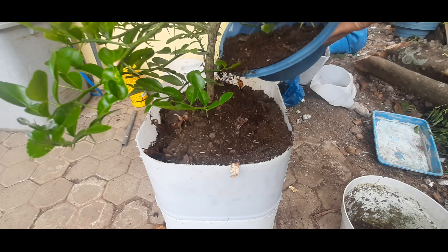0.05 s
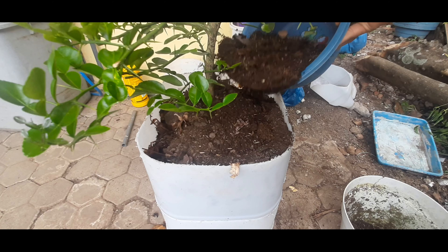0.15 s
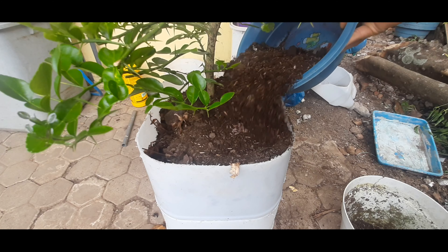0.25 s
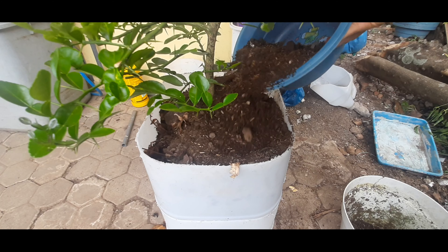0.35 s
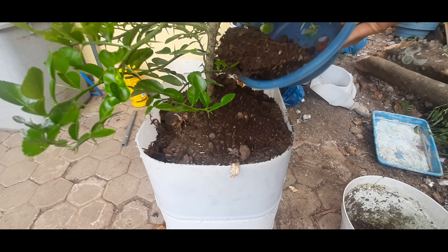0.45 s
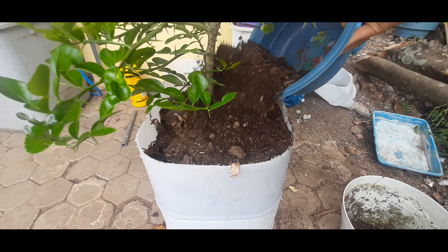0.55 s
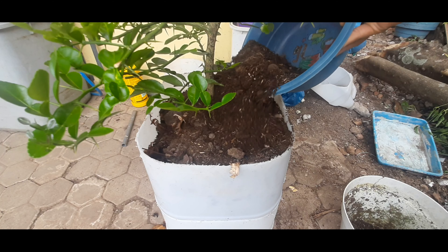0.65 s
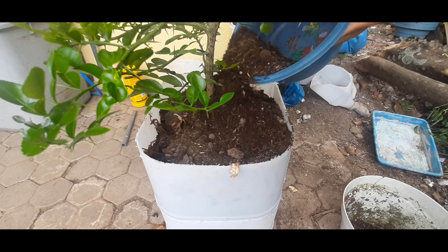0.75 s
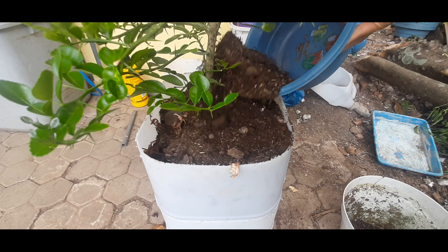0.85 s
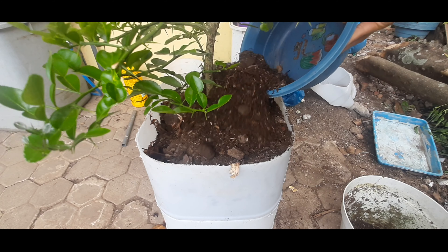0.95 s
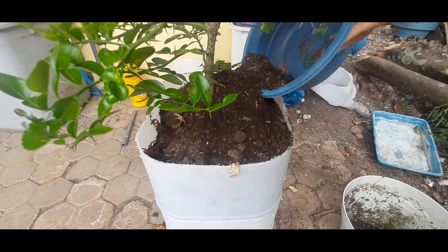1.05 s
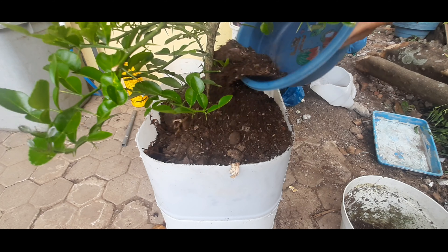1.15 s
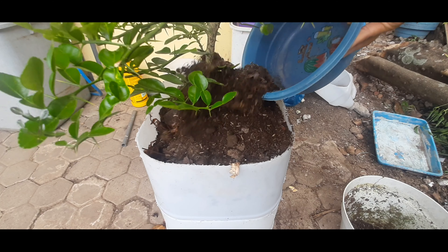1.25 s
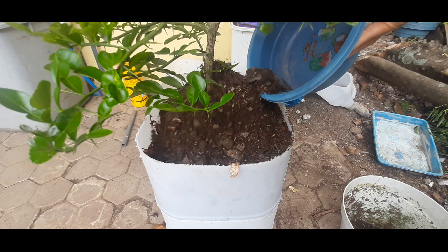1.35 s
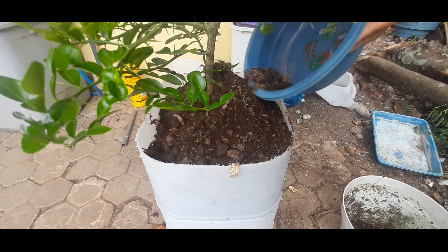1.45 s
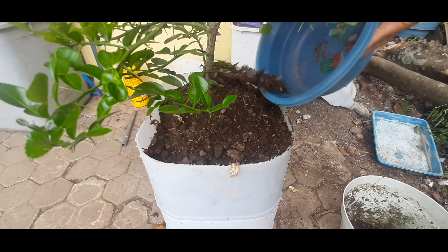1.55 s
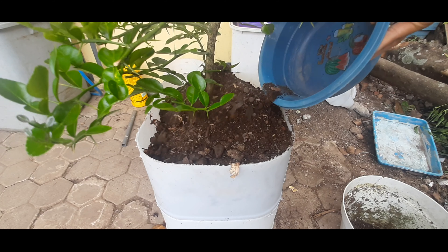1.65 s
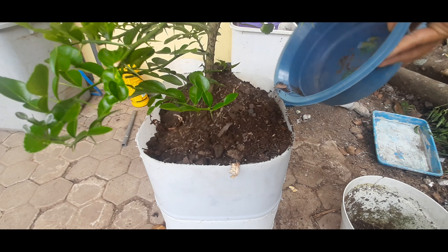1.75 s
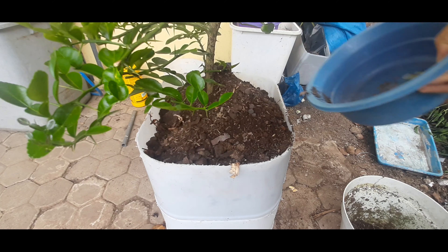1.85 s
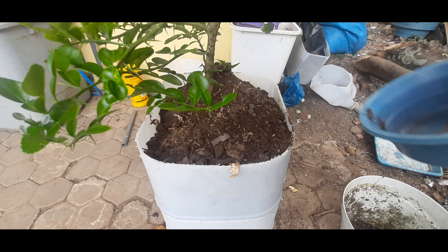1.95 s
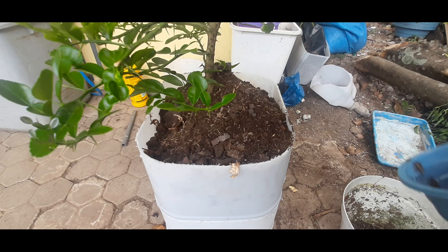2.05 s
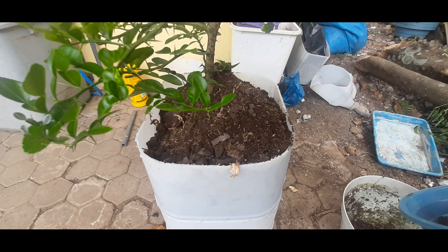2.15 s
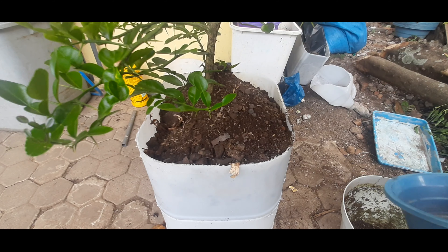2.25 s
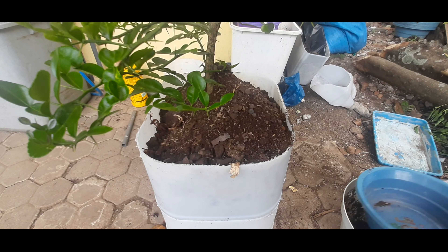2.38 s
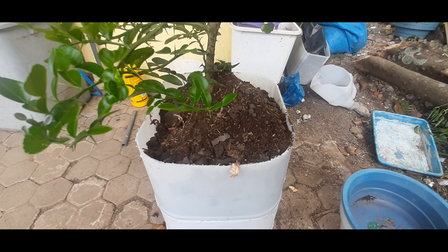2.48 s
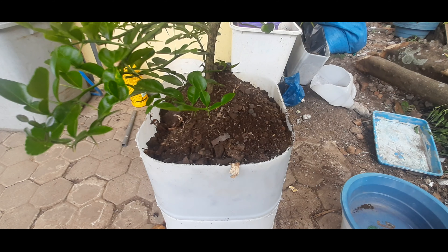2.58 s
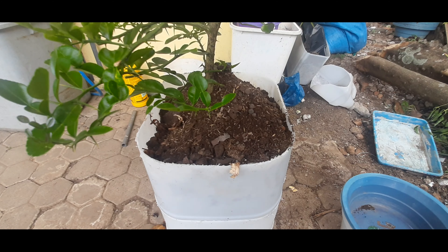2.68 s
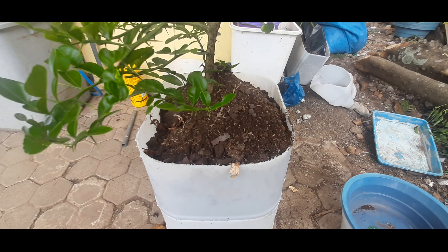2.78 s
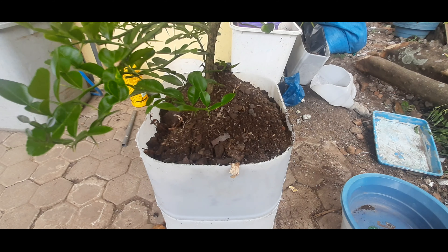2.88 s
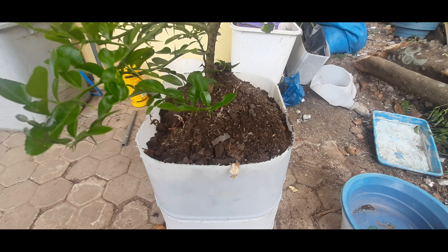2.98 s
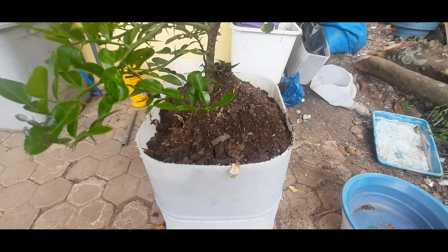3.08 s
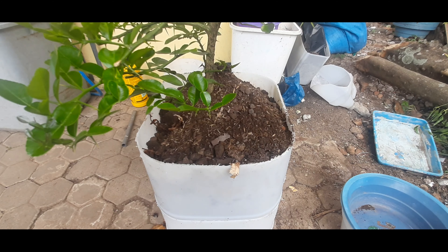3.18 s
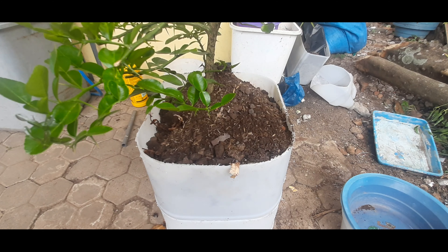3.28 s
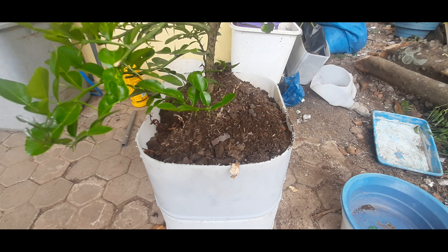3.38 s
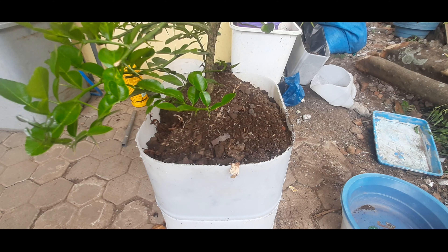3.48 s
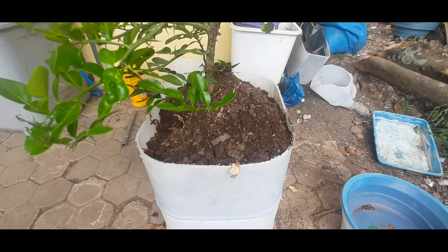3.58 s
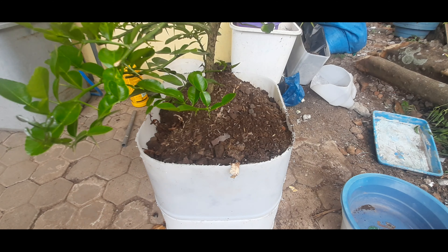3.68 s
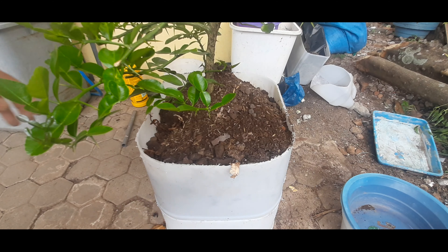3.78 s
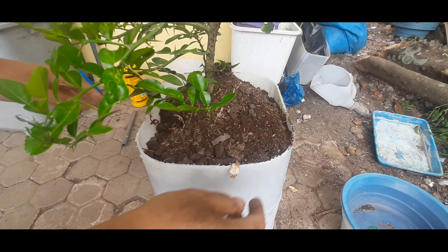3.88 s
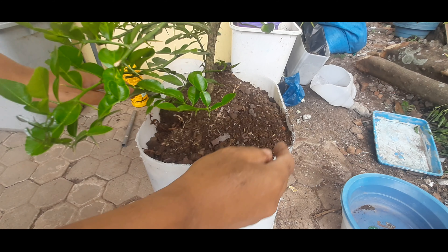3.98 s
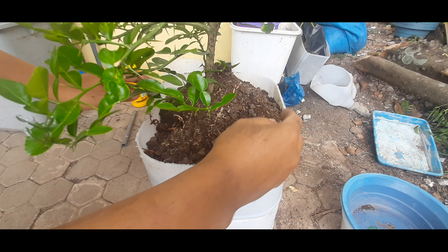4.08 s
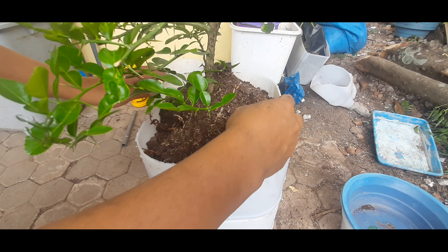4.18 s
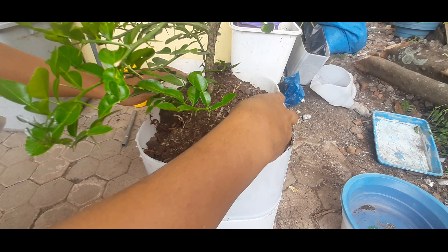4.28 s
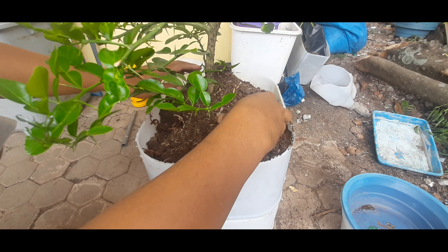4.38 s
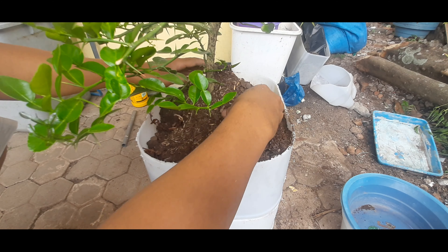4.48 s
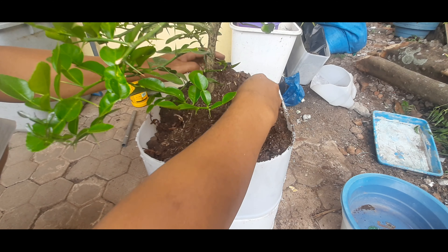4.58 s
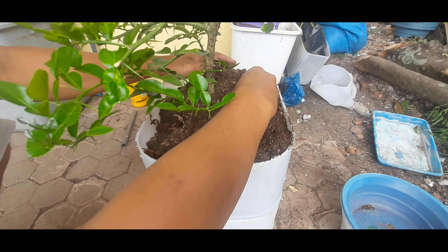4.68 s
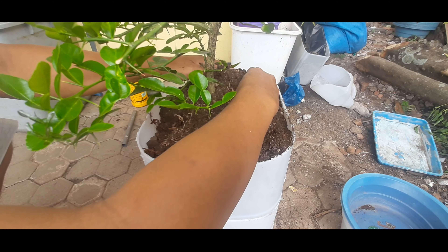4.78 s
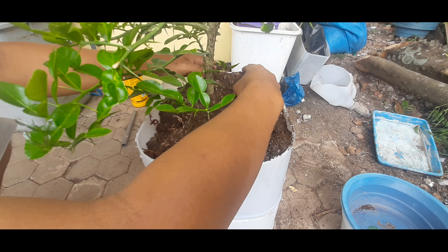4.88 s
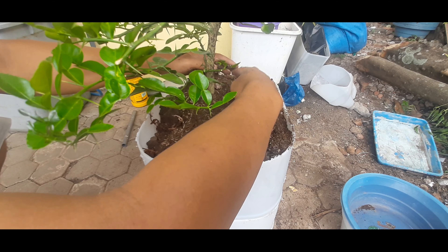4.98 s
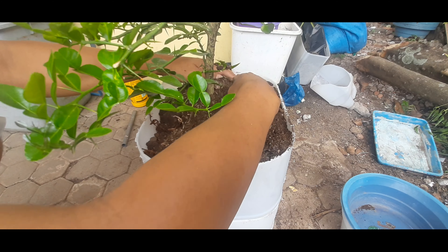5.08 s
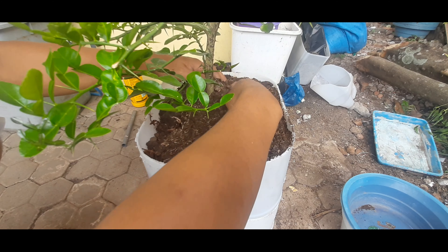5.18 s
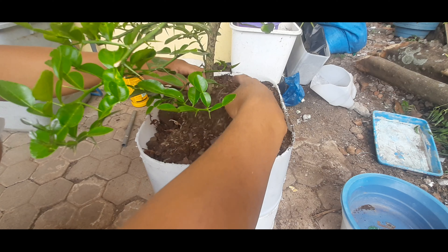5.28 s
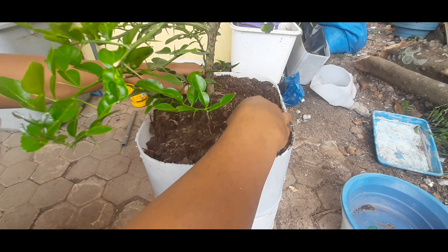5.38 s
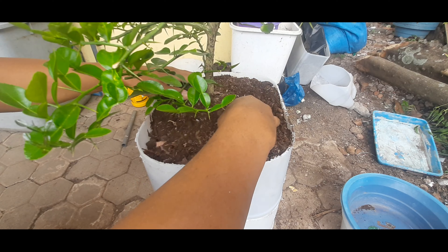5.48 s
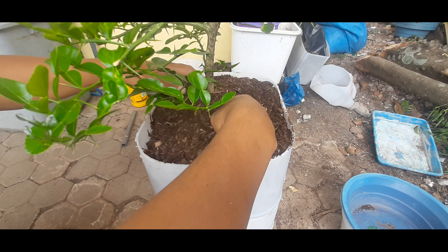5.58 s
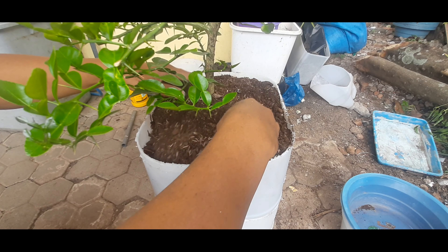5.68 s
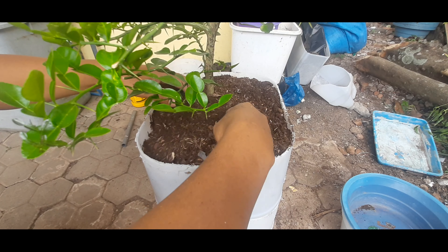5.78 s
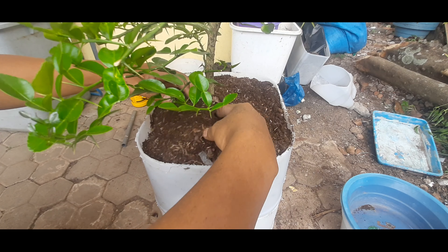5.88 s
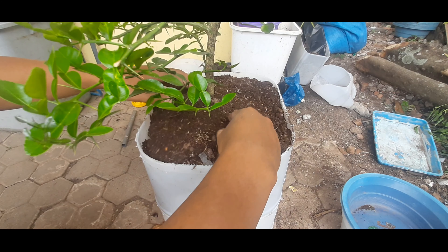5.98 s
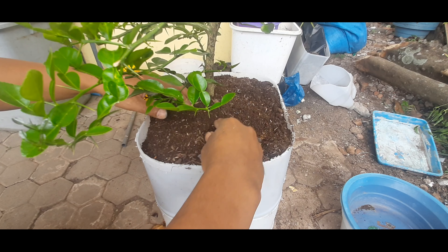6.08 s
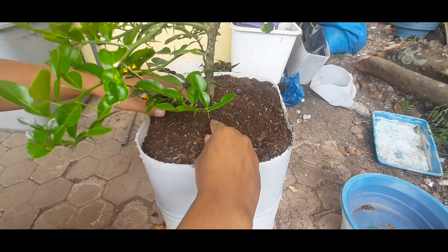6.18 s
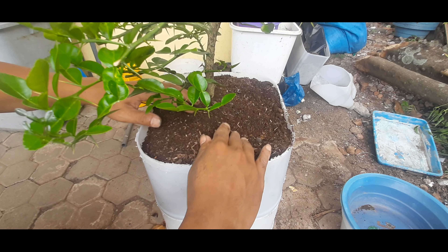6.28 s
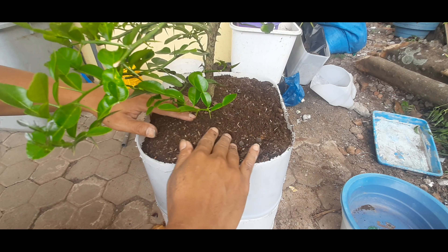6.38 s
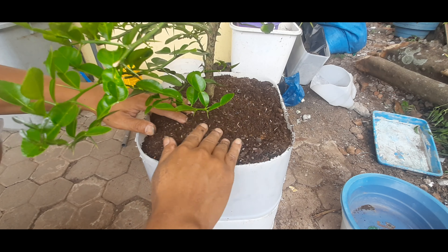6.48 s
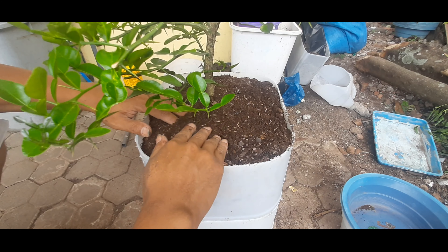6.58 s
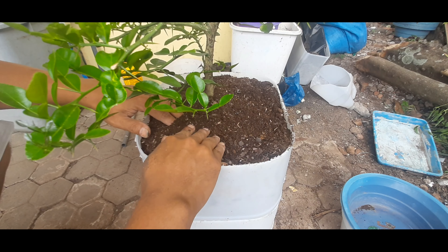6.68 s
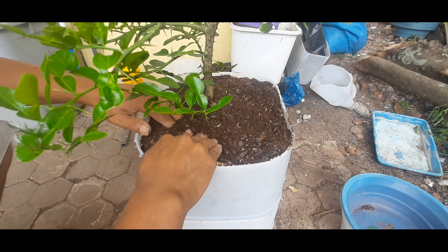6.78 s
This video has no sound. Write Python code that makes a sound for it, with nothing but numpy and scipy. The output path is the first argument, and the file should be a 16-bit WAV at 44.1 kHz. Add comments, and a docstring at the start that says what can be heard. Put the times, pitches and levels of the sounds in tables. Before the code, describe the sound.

A close, dry stereo outdoor scene with faint wavering engine drone, low traffic rumble and thin air hiss throughout. From 0 to 1.7 seconds, soil is shaken from a plastic basin into a planter in uneven crunchy, hissing slides, strongest near 0.2 and 0.6, with clods knocking and dry ticks. Sparse trickles and grit continue until about 2.45. At 2.5 the empty basin hits paving, by far the loudest event: a hollow plastic clack, then a fast, gritty rattle fading by 2.75. Feet scuff at 3.1, step softly near 3.67 and 4.0, with a tiny falling squeak at 3.76. Leaves swish around 3.2, 4.2, 5.5 and 6.5-6.7. A low soft thud comes at 4.8; hands brush faintly, pressing soil at 5.75 and 6.0 with small ticks. A faint motor hum rises near 6. The work shifts from right to left around 3.5.

```python
"""Far engine notes and rumble drone throughout under a thin air hiss. First, soil is shaken from a plastic
basin into a planter: random grains make crunch and hiss, and clods knock with short fading tones.
Then the basin drops on paving and rocks to rest: blows and grating set fading tones ringing in its wall.
Last, feet shuffle, a sole squeaks, and hands brush and press the soil past leaves that swish with clicks.
Two microphone ports a few centimetres apart hear the work move from right to left."""
import sys
import numpy as np
from scipy import signal
from scipy.fft import rfft, irfft
from scipy.io import wavfile
from scipy.ndimage import uniform_filter1d

SR = 44100
rng = np.random.default_rng(int(sys.argv[2]) if len(sys.argv) > 2 else 0)


def log_audio(samples):
    """Write samples as a 16-bit WAV file to the path given in sys.argv[1]."""
    # one column per channel
    frames = np.atleast_2d(samples).T
    # limit to full scale, then quantise
    limited = np.clip(frames, -1, 1)
    pcm = np.round(limited * 32767).astype(np.int16)
    wavfile.write(sys.argv[1], SR, pcm)


N = 302085


def undb(db):
    """Turn decibels into a plain multiplier."""
    return 10 ** (np.asarray(db) / 20)


def unit(x):
    """Scale a sound to an average (RMS) strength of 1."""
    return x / np.sqrt(np.mean(x ** 2))


def curve(rows):
    """Join each column of a table by straight lines over time, one value a sample."""
    s, *columns = np.transpose(rows)
    return [np.interp(np.arange(N) / SR, s, column) for column in columns]


def colour(x, points):
    """Make pitches stronger or weaker by (f/Hz, level/dB) points."""
    hz, db = np.transpose(points)
    log_hz = np.log(np.fft.rfftfreq(N, 1 / SR) + 1)  # + 1 avoids the log of zero
    gain = undb(np.interp(log_hz, np.log(hz), db))
    return irfft(rfft(x) * gain, N)


def ring(x, hz, t60):
    """Let x strike one tone that fades by 60 dB in t60 seconds."""
    pole = np.exp(2j * np.pi * hz / SR - np.log(1000) / (t60 * SR))
    return signal.lfilter([1], [1, -pole], x).imag


def walk(rate):
    """Wander smoothly: random steps, rate of them a second, averaged twice; spread near 1."""
    k = int(SR / rate)
    steps = np.repeat(rng.standard_normal(N // k + 1), k)
    return 1.694 * uniform_filter1d(uniform_filter1d(steps, k), k)[:N]


def grains(rate, spread_db, tail_s):
    """Scatter clicks of very uneven size, rate a second, each smeared into a short puff of noise."""
    clicks = (rng.random(N) < rate / SR) * undb(spread_db * rng.exponential(size=N))
    puffs = signal.lfilter([1], [1, -np.exp(-1 / (tail_s * SR))], clicks)
    return puffs * rng.standard_normal(N)


def add(track, s, shape):
    """Mix a short sound into a track at s seconds."""
    i = int(s * SR)
    track[i:i + len(shape)] += shape[:N - i]


def burst(decay_s, dull=.4):
    """Make a fading crack of noise; the duller, the lower the pitches where its noise gathers."""
    t = np.arange(int(8 * decay_s * SR)) / SR
    pole = np.clip(dull, 0, 1 - 1 / 8)
    noise = signal.lfilter([1, -1], [1, -2 * pole, pole ** 2], rng.standard_normal(len(t)))
    return unit(noise) * np.exp(-t / decay_s) / 2


def ports(x, wet_db):
    """The far port hears it a little later; scattering off leaves and walls adds its own part to each."""
    # the work moves from right to left: t/s, delay of the left port/s (below zero delays the right)
    port_lag = [(3.3, .00011), (3.6, -.00025)]
    yard_t60_s = .07  # time for the scattered sound to fade by 60 dB
    now = np.arange(N)
    lag = np.round(curve(port_lag)[0] * SR).astype(int)
    delays = np.maximum([lag, -lag], 0)
    direct = x[np.maximum(now - delays, 0)]
    t = np.arange(int(yard_t60_s * SR)) / SR
    tails = rng.standard_normal((2, len(t))) * 1000 ** (-t / yard_t60_s)
    tails = signal.lfilter([1, -.6], [1], tails)  # small surfaces return less bass
    wet = [signal.fftconvolve(x, unit(tail) / np.sqrt(len(t)))[:N] for tail in tails]
    return direct + undb(wet_db) * np.array(wet)


def note(hz, db, octave_db):
    """An engine note and its octave, wavering in pitch and level."""
    phase = 2 * np.pi * np.cumsum(hz * (1 + 0.009 * walk(14))) / SR
    level = np.sqrt(2) * undb(db + 2 * walk(12))
    octave = undb(octave_db + 2 * walk(8.8)) * np.sin(2 * phase)
    return level * (np.sin(phase) + octave)


def street():
    """Engine notes and rumble, nearly alike at both ports, and a thin air hiss that is not."""
    # two far engine notes: t/s, lower f/Hz, lower level/dB, upper f/Hz, upper level/dB
    drone = [(0, 106.4, -49.5, 115.9, -54), (.65, 106.5, -45, 128.4, -48),
             (1.9, 103.9, -55.5, 123.4, -42.5), (2.03, 106, -55, 127.1, -62),
             (2.36, 111.2, -45, 130.5, -48.5), (3.55, 97.8, -57.5, 132.6, -59.5),
             (3.9, 113.1, -50, 125, -55.5), (5.04, 104.2, -73, 132, -55), (5.5, 110.9, -52, 130, -50),
             (6.55, 119.5, -48.5, 127.8, -73)]
    # a faint motor tone, slightly wavering: f/Hz, level/dB
    motor_notes = [(301.5, -59)]
    # the motor comes up late: t/s, level/dB
    motor_rise = [(5.7, -14), (6.2, 0)]
    # strength of the traffic rumble: t/s, level/dB
    traffic = [(1.8, -49), (3.3, -54.5), (4.5, -49.5), (5.7, -51.5), (6.85, -47)]
    # balance of pitches in the rumble: f/Hz, relative level/dB
    traffic_colour = [(25, -56.5), (40, -7.5), (113, -3), (157, -10.5), (217, -5.5), (278, -12.5),
                      (630, -20.5), (792, -32.5), (1500, -46.5)]
    # balance of pitches in the air hiss: f/Hz, relative level/dB
    air_colour = [(600, -32.5), (900, -5.5), (2140, 1.5), (4500, -22), (8250, -5.5), (16000, -16.5)]
    low_hz, low_db, high_hz, high_db = curve(drone)
    notes = note(low_hz, low_db, octave_db=-12.0) + note(high_hz, high_db, octave_db=-14.5)
    motor = sum(note(np.full(N, 1. * hz), db, octave_db=-8.5) for hz, db in motor_notes)
    motor = motor * undb(curve(motor_rise)[0])
    mid, side = (unit(colour(rng.standard_normal(N), traffic_colour)) for _ in range(2))
    side = colour(side, [(40, -10.0), (120, -14.5), (1400, 1.5)])
    # the side part is added at one port and subtracted at the other
    rumble = undb(curve(traffic)[0] + walk(2.854)) * (mid + side * np.array([[1], [-1]]))
    air = [unit(colour(rng.standard_normal(N), air_colour)) * undb(-73) for _ in range(2)]
    return (notes + motor + rumble) * undb([[.7], [-.7]]) + np.array(air)


def swells(rows, rise, fall):
    """Power of crunch and hiss: every row rises at a steady dB rate, holds and falls."""
    s, hold, *db = np.transpose(rows)[:, :, None]
    t = np.arange(N) / SR
    early = np.maximum(s - t, 0)
    late = np.maximum(t - s - np.maximum(hold, 0), 0)
    return np.array([np.sum(undb(2 * (d - r * early - f * late)), axis=0)
                     for d, r, f in zip(db, rise, fall)])


def motion():
    """Levels of crunch and hiss in dB, adding the power of all that moves soil or grit."""
    # soil trickling over the rim between shakes, then a faint steady sift:
    # t/s, crunch level/dB, hiss level/dB
    trickle = [(0, -62, -56.5), (.09, -73, -63), (.4, -65, -56.5), (1.03, -59.5, -57.5), (1.35, -65, -52),
               (1.6, -55, -53), (2.2, -69, -57.5), (2.75, -66.5, -66.5), (2.95, -100, -71.5)]
    # each shake of the basin lets a slide of soil go:
    # t/s, hold/s, level/dB for crunch of crumbs, level/dB for hiss of fine dust
    pours = [(0.15, 0.15, -49, -53), (0.2, 0.015, -38, -45.5), (0.51, 0.14, -47, -57),
             (0.575, 0.0044, -45.5, -43), (0.845, 0.12, -51, -53), (1.13, 0.18, -53, -62),
             (1.535, 0.016, -44.5, -51), (2.03, 0.0044, -54, -55), (2.28, 0.067, -56, -54),
             (2.46, 0.24, -51.5, -57)]
    # a foot or hand slides along: t/s, hold/s, crunch level/dB, hiss level/dB
    brushes = [(3.13, 0.11, -55.5, -54.5), (3.81, 0.048, -65, -69), (4.19, 0.0084, -61.5, -56),
               (4.33, 0.063, -63, -71), (4.5, 0.43, -70, -67), (5.39, 0.28, -76, -60),
               (6.255, 0.029, -62, -70), (6.44, 0.093, -64.5, -61), (6.72, 0.12, -63, -83)]
    # a foot or palm lands at once, presses on and the grains settle:
    # t/s, hold/s, crunch level/dB, hiss level/dB
    pats = [(3.67, 0.0099, -50, -53), (4.008, 0.0061, -53.5, -50.5), (5.745, 0.097, -58, -58.5),
            (6.012, 0.05, -55.5, -59.5)]
    # rise and fall are in dB per s, as (crunch, hiss)
    power = undb(2 * np.array(curve(trickle)))
    power = power + swells(pours, rise=(420, 220), fall=(360, 160))
    power = power + swells(brushes, rise=(320, 210), fall=(280, 240))
    power = power + swells(pats, rise=(2600, 1900), fall=(144, 99))
    return 10 * np.log10(power)


def soil():
    """Crumbs of each size come and go and ring briefly; dust is a denser hiss, different at each port."""
    # balance of pitches in the crumbs: f/Hz, relative level/dB
    crumb_colour = [(250, -22.5), (400, -4.5), (850, -3), (1100, -8), (1900, -0.5), (3200, -12.5),
                    (6000, -31)]
    # balance of pitches in the dust: f/Hz, relative level/dB
    dust_colour = [(3500, -16), (12500, -11), (16000, -16.5)]
    sand_colour = [(1800, -23.5), (3000, -5.5), (8000, -23.5)]  # f/Hz, relative level/dB
    steps_start_s, steps_end_s = 2.8, 4.3
    crunch_db, hiss_db = motion()
    now = np.arange(N) / SR
    # after the pour both low and high crumb tones weaken; under the feet the low ones weaken more
    after_pour = now > steps_start_s
    under_feet = after_pour & (now < steps_end_s)
    sizes = []
    for hz in 350 * 1.25 ** np.arange(13):
        low_cut_db = (8.0 * after_pour + 8.0 * under_feet) * max(np.log2(1500 / hz), 0)
        high_cut_db = 25.0 * after_pour * max(np.log2(hz / 2900), 0)
        clicks = grains(rate=260, spread_db=2.5, tail_s=0.00069)
        ringing = unit(ring(clicks, hz, 14 / hz)) * np.sqrt(hz)
        sizes.append(ringing * undb(2 * walk(7) - low_cut_db - high_cut_db))
    crumbs = unit(colour(sum(sizes), crumb_colour)) * undb(crunch_db + walk(60))
    crumbs = ports(undb(2) * crumbs, wet_db=0)
    dust, sand = (np.array([unit(colour(grains(rate=2100, spread_db=2.5, tail_s=0.0014), points))
                            for _ in range(2)]) for points in (dust_colour, sand_colour))
    # grains between the two sizes follow both; damp soil under the hands sheds fewer
    sand_db = (hiss_db + crunch_db) / 2 - 6.0 - 27.0 * (now > steps_end_s)
    fine = dust * undb(hiss_db) + sand * undb(sand_db)
    return crumbs + fine * undb(walk(30) + np.array([[.6], [-.6]]))


def knocks():
    """Each clod or bit of grit rings near its own pitch, with duller neighbours, and ticks with noise."""
    # clods and grit knocking on plastic, stone or packed soil: t/s, level/dB, f/Hz
    hits = [(0.204, -14.5, 1770), (0.226, -25.5, 853), (0.311, -37, 1910), (0.465, -41, 1440),
            (0.605, -21, 1330), (0.625, -24.5, 804), (0.815, -34, 880), (0.968, -34.5, 1550),
            (0.992, -34.5, 1556), (1.186, -27.5, 1358), (1.293, -27, 2140), (1.515, -26.5, 2310),
            (1.541, -28.5, 1063), (2.034, -45, 1522), (2.275, -32, 1640), (2.456, -34, 1019),
            (5.7456, -48, 1190), (6.0105, -41, 1310), (6.079, -42, 1784)]
    out = np.zeros(N)
    t = np.arange(int(.03 * SR)) / SR
    for (s, db, hz), (a, b) in zip(hits, rng.random((len(hits), 2))):
        body = np.sin(2 * np.pi * hz * t) * np.exp(-t * hz / 3.5)
        body += 0.47 * np.sin(2 * np.pi * hz * (1.3 + 0.22 * a) * t) * np.exp(-t / 0.0035)
        body += 0.43 * np.sin(2 * np.pi * hz * (.5 + 0.27 * b) * t) * np.exp(-t / 0.0024)
        add(out, s, undb(db) * body * (1 - np.exp(-t / 0.000081)))
        add(out, s, undb(db - 16.5) * burst(0.0036, dull=0.33))
    return out


def ticks():
    """Grit or twig snaps for about one cycle of a tone, with a spit of dust as noise."""
    # single dry ticks: t/s, level/dB, f/Hz
    snaps = [(0.2573, -29, 6500), (1.085, -28, 5000), (1.515, -20, 2400), (1.662, -27, 4200),
             (1.8373, -29, 3500), (1.915, -28, 4000), (2.0557, -29, 5500), (2.4816, -22, 2200),
             (4.0149, -31, 3000), (4.984, -40, 12000), (5.8387, -32, 10500), (5.9537, -37, 11000),
             (6.67, -33, 10500)]
    out = np.zeros(N)
    t = np.arange(int(.03 * SR)) / SR
    for s, db, hz in snaps:
        add(out, s, undb(db) * np.sin(2 * np.pi * hz * t) * np.exp(-t * hz / 1.1))
        add(out, s, undb(db - 6.5) * burst(0.0022, dull=1 - 2 * np.pi * hz / SR))
    return out


def basin():
    """Blows ring the wall, each blow's tones shifted a little in pitch and level at random; grit cracks."""
    # the rim meets the paving: t/s, level/dB, crack level/dB relative to the blow, length of push/s
    blows = [(2.492, -0.5, -15, 0.00095), (2.504, -16, -12, 0.00075), (2.515, -9, -12, 0.00083),
             (2.526, -5, -4.5, 0.0014), (2.538, -9, -25, 0.0026), (2.555, -16, -25, 0.0014),
             (2.584, -14.5, -25, 0.00073), (2.609, -15, -19, 0.00071), (2.618, -17.5, -15, 0.00056),
             (2.631, -16.5, -30, 0.0013), (2.652, -22.5, -30, 0.003), (2.665, -30, -32, 0.00074),
             (2.686, -17, -29, 0.0026), (2.710, -27, -10, 0.0012)]
    # the rim grates over the stone between blows: t/s, level/dB
    rocking = [(2.49, -80), (2.496, -28.5), (2.527, -30), (2.571, -43.5), (2.622, -37.5), (2.685, -58),
               (2.84, -92.5)]
    # tones of the empty basin: f/Hz, relative level/dB, time to fade by 60 dB/s
    wall_tones = [(244.2, -8, 0.046), (300.6, -4.5, 0.092), (380.3, -3.5, 0.072), (419.4, -2.5, 0.063),
                  (580, -4, 0.041), (629.6, -7.5, 0.045), (1069, -9, 0.035), (1153, 1, 0.035),
                  (1390, -9.5, 0.025), (1790, -11.5, 0.025)]
    modes, crack = np.zeros(N), np.zeros(N)
    chances = rng.standard_normal((len(blows), 2, len(wall_tones)))
    for (s, db, crack_db, contact_s), chance in zip(blows, chances):
        push = np.zeros(SR // 8)
        # the wall gives before it pushes back
        add(push, 0, undb(db) * np.hanning(int(contact_s * SR)) ** 4 / 8)
        add(modes, s, sum(undb(gain_db + a) * ring(push, hz * (1 + .015 * b), t60)
                          for (hz, gain_db, t60), a, b in zip(wall_tones, *chance)))
        add(crack, s, undb(db + crack_db) * burst(0.0051, dull=0.85))
    rasp = grains(rate=700, spread_db=3.0, tail_s=0.00096)
    grate_db = curve(rocking)[0]
    shiver = undb(grate_db - 18.5) * unit(uniform_filter1d(rasp, size=16))  # the grating shakes the wall too
    modes += sum(undb(db) * ring(shiver, hz, t60) for hz, db, t60 in wall_tones)
    grit = colour(rasp, [(800, -8.0), (2200, 12.5), (4500, -0.5), (16000, -15.5)])
    # so small a body radiates little under its lowest tone
    modes = signal.sosfilt(signal.butter(4, 250, "high", fs=SR, output="sos"), modes)
    return ports(undb(-11.5) * modes + crack + undb(grate_db) * unit(grit), wet_db=4.0)


def leaves():
    """Short bright swishes of tiny clicks, different at each port."""
    # an arm flicks past the leaves: t/s, level/dB
    flicks = [(3.235, -55.5), (4.19, -52), (5.49, -56), (6.48, -56.5), (6.6, -60.5), (6.675, -53.5)]
    # balance of pitches in the swish: f/Hz, relative level/dB
    leaf_colour = [(6000, -16), (11000, -2.5), (16000, -8.5)]
    width_s = 0.027  # spread of each bell-shaped swell
    t = np.arange(N) / SR
    shape = sum(undb(db) * np.exp(-.5 * ((t - s) / width_s) ** 2) for s, db in flicks)
    return shape * np.array([unit(colour(grains(rate=700, spread_db=1.0, tail_s=0.0023), leaf_colour))
                             for _ in range(2)])


def thuds():
    """Soft footfalls and presses give a few cycles of low, damped push."""
    # t/s, level/dB, f/Hz
    pushes = [(3.662, -44.5, 198.7), (4.004, -37.5, 186.1), (4.807, -33.5, 101)]
    out = np.zeros(N)
    t = np.arange(int(.15 * SR)) / SR
    for s, db, hz in pushes:
        fade = (1 - np.exp(-t / 0.00084)) * np.exp(-t / 0.035)
        add(out, s, undb(db) * np.sin(2 * np.pi * hz * t) * fade)
    return out


def squeak():
    """A sole twists on the stone: a brief, rough tone whose pitch slides down."""
    middle_s, width_s = 3.76, .009
    db, hz, glide = -53, 2550, -17000  # pitch at the middle in Hz, slide in Hz per s
    t = np.arange(N) / SR - middle_s
    swell = (1 + walk(600)) * np.exp(-.5 * (t / width_s) ** 2)
    return undb(db) * swell * np.sin(2 * np.pi * (hz + glide * t / 2) * t)


def scene():
    """Add up all the sounds at the two ports."""
    small_hits = ports(knocks() + ticks() + squeak(), wet_db=-2)
    return street() + soil() + small_hits + basin() + leaves() + thuds()


def record(dry):
    """The recorder cuts the top steeply, above 15700 Hz."""
    return signal.sosfilt(signal.ellip(8, .2, 70, 15700, fs=SR, output="sos"), dry)


dry = scene()
out = record(dry)
log_audio(out)
```